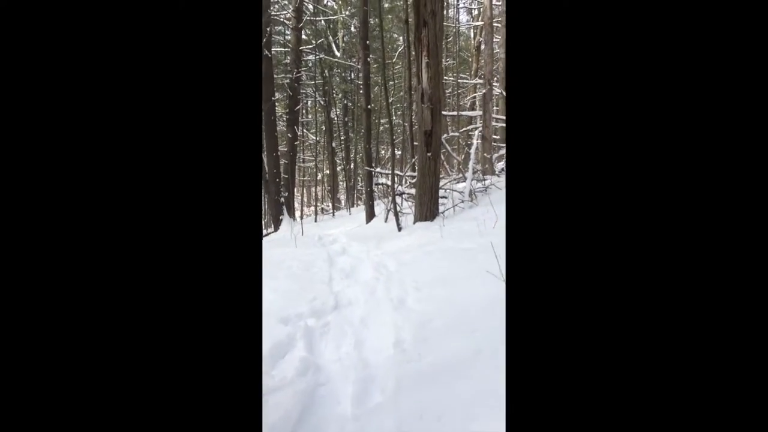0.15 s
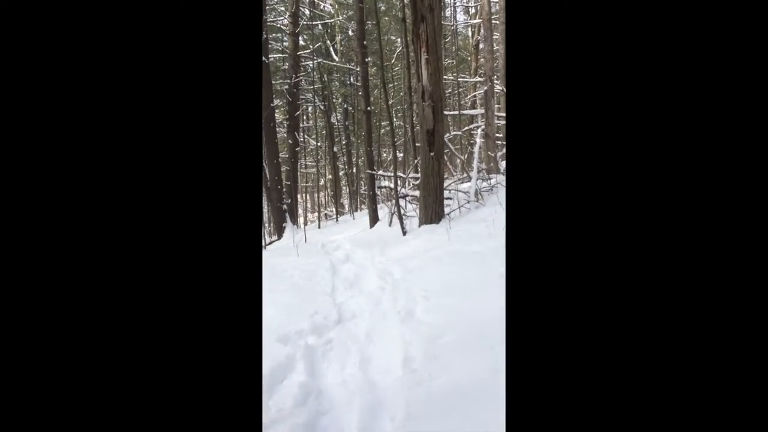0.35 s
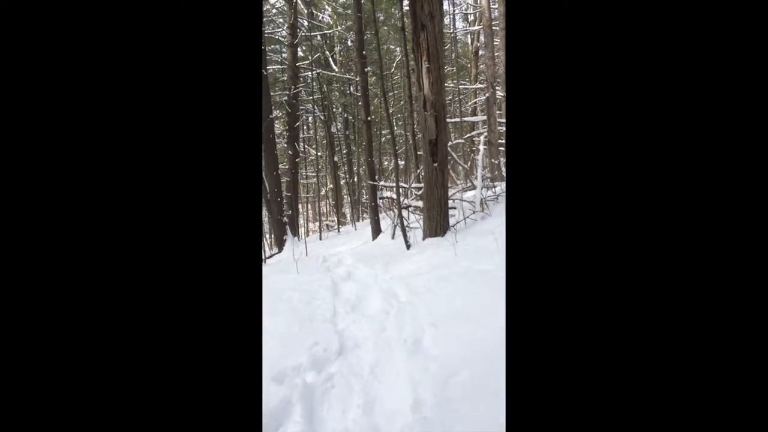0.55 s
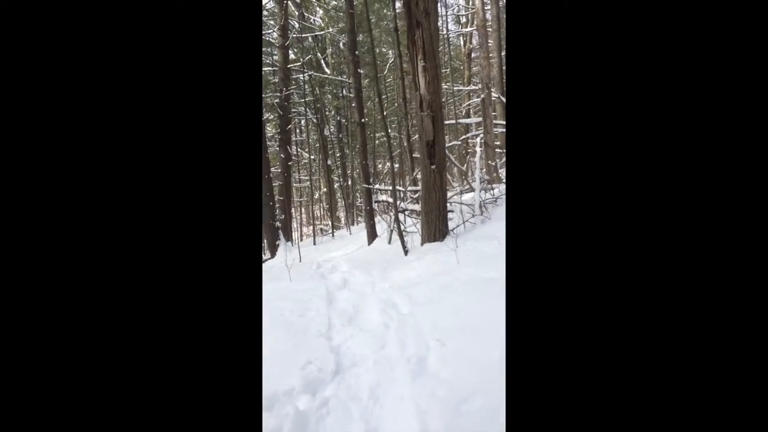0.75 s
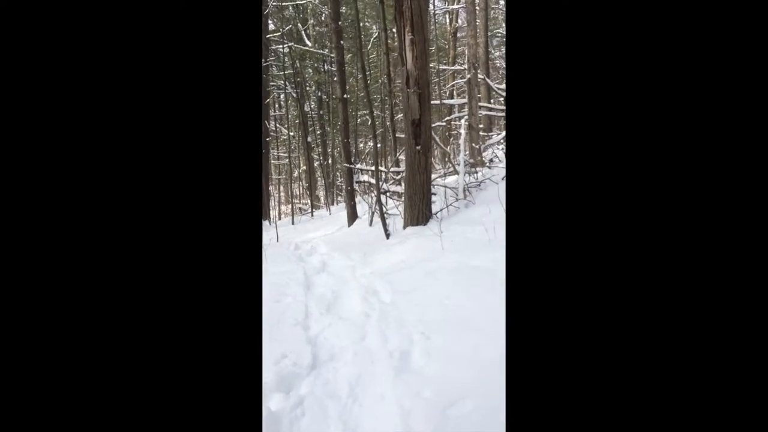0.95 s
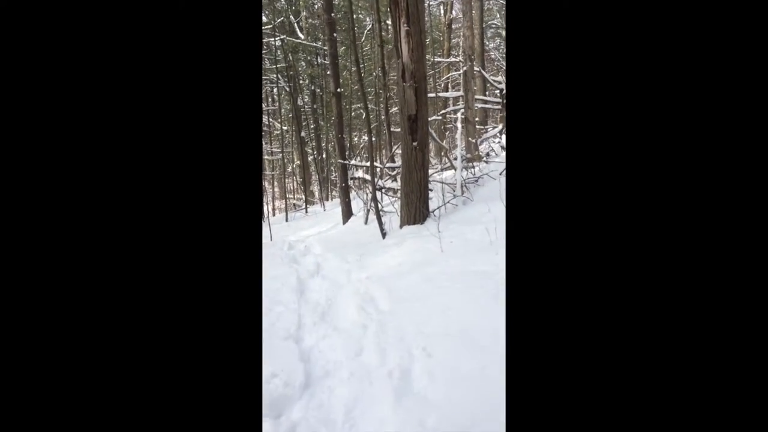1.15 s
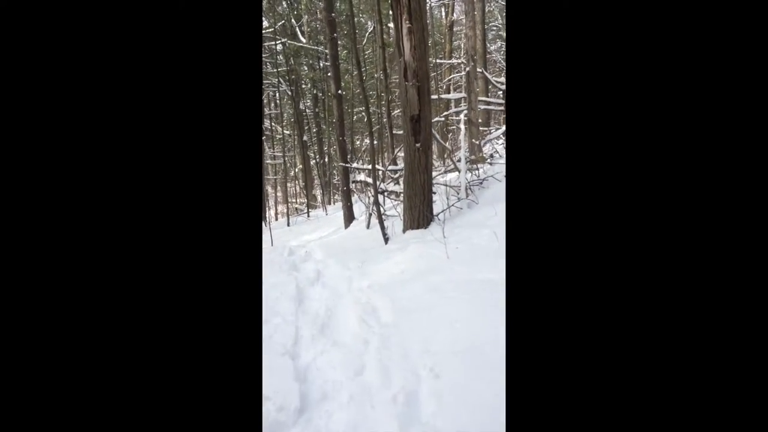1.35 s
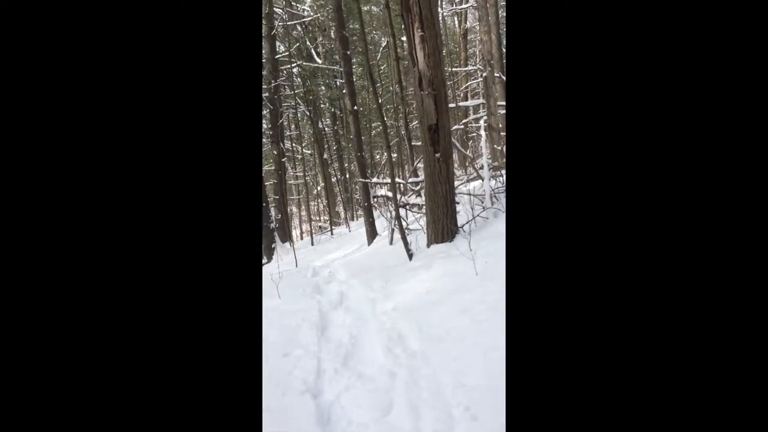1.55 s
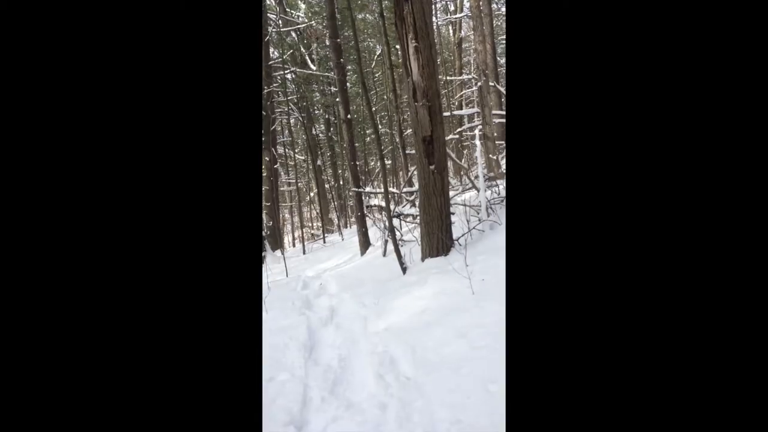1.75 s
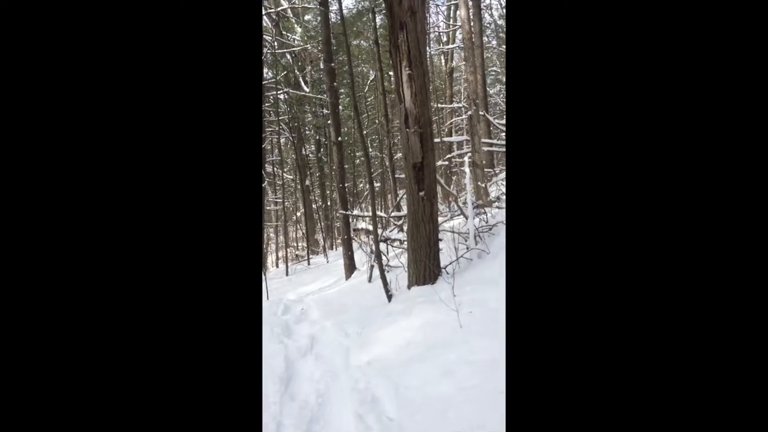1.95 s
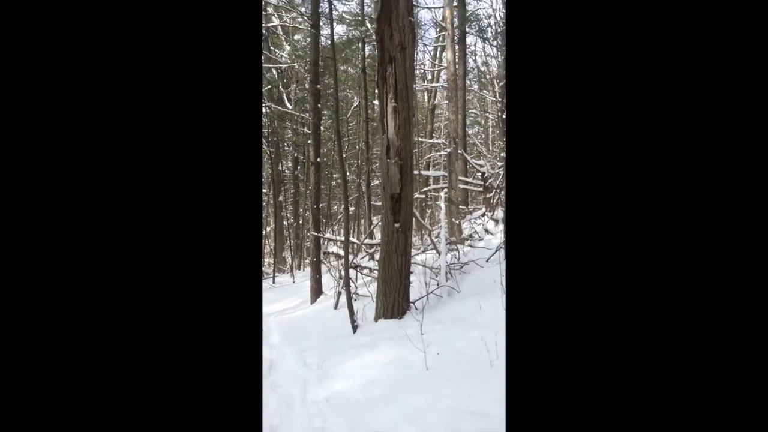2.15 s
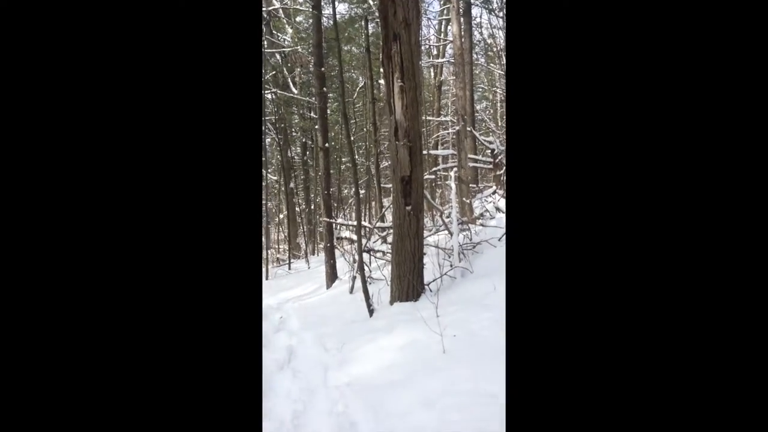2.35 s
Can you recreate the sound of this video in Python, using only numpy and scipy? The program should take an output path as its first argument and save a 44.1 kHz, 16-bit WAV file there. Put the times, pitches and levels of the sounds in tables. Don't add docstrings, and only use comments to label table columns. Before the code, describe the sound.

Footsteps on snow, heard from a phone in the walker's hand: powder drags, dull thuds and icy crunches, a tiny strap squeak, then sleeve rustle and low handling bumps, outdoors with almost no echo.

```python
import sys
import numpy as np
from scipy import signal
from scipy.fft import rfft, irfft
from scipy.io import wavfile
from scipy.ndimage import uniform_filter1d

SR = 44100
rng = np.random.default_rng(int(sys.argv[2]) if len(sys.argv) > 2 else 0)


def transcribe(signal):
    frames = np.atleast_2d(signal).T
    limited = np.clip(frames, -1, 1)
    pcm = np.round(limited * 32767).astype(np.int16)
    wavfile.write(sys.argv[1], SR, pcm)


def nominal_scale(level):
    x = np.asarray(level, float) / 20
    return 10 ** x


N = 110250
TIME_S = np.arange(N) / SR

# pitch_hz, level_db (per Hz)
WOODS_TONE = [(18, -60), (30, -7), (662, -4), (1110, -7.5), (1730, -13), (2990, -27.5), (3680, -20.5),
              (4200, -26.5), (15000, -34.5)]
# peak_s, level_db, pitch_hz
BUMPS = [(.07, -58.5, 90), (1.0, -56, 100), (1.1229, -48, 2020), (1.24, -58, 100), (1.585, -49.5, 95),
         (1.612, -54.5, 80), (1.71, -55, 90), (1.861, -36.5, 79), (1.902, -43.5, 67), (1.92, -46, 80),
         (1.9314, -50, 152), (1.989, -49, 204), (2.0361, -41, 248), (2.0443, -44, 210), (2.0776, -40.5, 96),
         (2.0946, -38.5, 65.7), (2.1355, -50, 70), (2.203, -46.5, 60), (2.2204, -37.5, 108),
         (2.2383, -45, 117), (2.3547, -45.5, 84.5), (2.399, -50.5, 70)]
# time_s, pitch_hz, level_db
SLEEVE_PATH = [
    (1.90, 6200, -76),
    (1.95, 6800, -65),
    (2.029, 7700, -61.5),
    (2.06, 7800, -77),
]
# time_s, pitch_hz, level_db
SQUEAK_PATH = [
    (.959, 5700, -78),
    (.967, 5000, -64.5),
    (.984, 6150, -62.5),
    (.988, 4640, -62.5),
    (.992, 2500, -80),
]
# start_s, peak_db, pitch_hz
TICKS = [(0.0932, -45.5, 4100), (0.415, -52, 4470), (0.6625, -54, 4010), (0.6789, -58, 4700),
         (0.69, -55, 4260), (0.7284, -47, 6680), (0.7514, -47, 6520), (0.772, -42, 6520),
         (0.7808, -43, 4300), (0.7914, -42, 7030), (0.8031, -43, 4600), (1.0124, -55, 3580),
         (1.1222, -49, 2920), (1.3944, -39.5, 6350), (1.572, -59, 8000), (1.648, -57, 5980),
         (1.6679, -50, 6140), (1.9018, -46, 4273), (2.3855, -55, 4540)]
TICK_RINGS_HZ = (4100, 6800, 9900)
# start_s, peak_db, pitch_hz
KNOCKS = [(0.2460, -39.5, 800), (0.263, -45, 970), (0.37, -46, 905), (.417, -45.5, 895), (.8113, -36, 644),
          (0.9476, -44.5, 1830), (.992, -49.5, 710), (1.046, -53.5, 470), (1.1226, -56, 520),
          (1.394, -38.5, 2490), (1.567, -46.5, 855), (1.775, -49, 1310), (1.807, -47.5, 920),
          (2.033, -43.5, 730), (2.166, -48, 880)]
# start_s, fullest_s, end_s, level_db, finest_hiss_extra_db
DRAGS = [(.0, 0.168, 0.27, -59.5, -5.5), (0.177, .25, 0.33, -54, -0.5), (0.298, .37, 0.37, -63, -16),
         (0.411, 0.41, 0.53, -59.5, -10), (0.581, 0.609, 0.65, -59, -1), (0.659, 0.677, 0.79, -56.5, -0.5),
         (.77, .775, 0.8, -59.5, -2), (0.792, 0.849, 0.9, -51.5, -4.5), (0.906, 1.01, 1.075, -63, -5),
         (1.11, 1.167, 1.225, -65, -2), (1.232, 1.325, 1.48, -58.5, -3), (1.35, 1.435, 1.5, -53, 0),
         (1.476, 1.513, 1.78, -66, -7), (1.575, 1.585, 1.674, -64, 2), (1.727, 1.801, 1.853, -59, 0.5),
         (1.84, 1.86, 1.92, -71, -2), (1.881, 1.937, 2.03, -57.5, -1.5), (1.943, 2.04, 2.104, -57, 1.5),
         (2.066, 2.12, 2.42, -64.5, -9), (2.413, 2.485, 3.1, -61, -5)]
# pitch_hz, level_db (per Hz)
DRAG_TONE = [(880, -5.5), (1500, -2), (3120, -6), (4050, -3), (5670, -5), (6610, -4), (8750, -6.5),
             (15000, -12.5)]
# peak_s, level_db, pitch_hz
CRUSTS = [(.0823, -51, 1650), (.1502, -50, 1400), (.2470, -43, 1560), (.2559, -46, 1180),
          (.2754, -41, 1180), (.2865, -53, 1010), (.3218, -55, 700), (.3492, -59, 990), (.3735, -46, 2020),
          (.4205, -45, 2060), (.5208, -52, 1960), (.5527, -57, 1980), (.6001, -55, 420), (.6630, -49, 1180),
          (.6690, -48, 1660), (.7064, -48.5, 700), (.8022, -50, 1660), (.8406, -48, 1650),
          (.8481, -51, 2800), (.8556, -47, 3300), (.8600, -46, 1250), (.8705, -46, 420), (.8785, -50, 1700),
          (.9254, -43.5, 650), (.9394, -52, 1900), (.9803, -51.5, 593), (.9957, -53, 990),
          (1.2357, -52, 1390), (1.3450, -50, 348), (1.3574, -45, 350), (1.4018, -48, 2800),
          (1.4123, -53, 1410), (1.4312, -42, 2350), (1.4492, -46, 2800), (1.4572, -44, 825),
          (1.4756, -45, 343), (1.4831, -49, 346), (1.4921, -52, 1400), (1.5325, -52, 1400),
          (1.5690, -48.5, 1490), (1.7899, -53, 990), (1.9336, -46, 1180), (1.9386, -50, 1180),
          (1.9715, -49, 1400), (1.9775, -49.5, 346), (2.0394, -49, 995), (2.0932, -53, 1400),
          (2.1162, -51, 990), (2.1366, -47.5, 990), (2.1431, -47.5, 487), (2.1676, -48, 1720),
          (2.3165, -57, 1090), (2.4040, -53, 416), (2.4434, -61, 590)]
# start_s, fullest_s, end_s, level_db, bass_extra_db
PACKS = [(0.098, 0.23, 0.34, -58.5, -11), (0.246, 0.261, 0.3, -48, -3), (0.3, 0.387, 0.49, -57.5, 3),
         (0.441, 0.534, 0.76, -60, -9.5), (0.624, .70, 0.83, -60, -33), (0.787, 0.824, 0.84, -53.5, -13),
         (0.828, 0.845, 0.89, -49.5, 3.5), (0.897, 0.941, 0.96, -57, 8), (0.984, 0.99, 1.04, -69, -5),
         (1.16, 1.24, 1.21, -74, 6.5), (1.332, 1.362, 1.37, -56, -7), (1.366, 1.42, 1.51, -50.5, -0.5),
         (1.482, 1.56, 1.57, -61, 5), (1.664, 1.702, 1.7, -68, -11), (1.742, 1.776, 1.84, -62, -0.5),
         (1.865, 1.916, 2.09, -62, 4), (1.995, 2.047, 2.33, -57, -2), (2.1, 2.17, 2.25, -61.5, 3.5),
         (2.383, 2.4, 2.7, -70.5, 5)]
# pitch_hz, level_db (per Hz)
CRUNCH_TONE = [(250, -1.5), (450, 1.5), (620, -2.5), (920, 1.5), (1450, -3), (2150, -4.5), (2700, -10),
               (8000, -23.5)]
# pitch_hz, level_db (per Hz)
GIVE_TONE = [(25, -38), (55, 5), (150, -3.5), (300, -3.5), (500, -15.5), (900, -47.5)]
# peak_s, level_db, pitch_hz
THUDS = [(0.1989, -41, 324), (0.2189, -46, 82.5), (0.2477, -19.5, 184.5), (0.2661, -44, 149),
         (0.2754, -42, 157.0), (0.2936, -49, 150), (0.3003, -50, 108), (0.3326, -43, 181),
         (0.3494, -45, 198), (0.3638, -44.5, 230), (0.3883, -43, 202), (0.4030, -44.5, 149),
         (0.4075, -42.5, 156), (0.7085, -54, 350), (0.8143, -37, 395), (0.8373, -50, 220),
         (0.8416, -30, 239), (0.8485, -36, 99), (0.8565, -48, 190), (0.8819, -44.5, 158.0),
         (0.8981, -49, 62), (0.9204, -47.5, 140), (0.9402, -37, 470), (0.9487, -36.5, 236),
         (1.3956, -25.5, 212), (1.4181, -48, 273), (1.4277, -51, 140), (1.4358, -45.5, 147.0),
         (1.4508, -49, 100), (1.4598, -47, 250), (1.472, -46, 200), (1.482, -40.5, 114), (1.5042, -49, 140),
         (1.5573, -54.5, 200), (1.5685, -51, 221), (1.8075, -45.5, 402)]


def colour(x, tone):
    hz, db = np.array(tone, float).T
    f = np.maximum(np.arange(N // 2 + 1) * SR / N, 1)
    gain = nominal_scale(np.interp(np.log(f), np.log(hz), db))
    y = irfft(rfft(x) * gain, N)
    return y / np.sqrt(np.mean(y ** 2))


def low_part(x, cutoff_hz, order):
    return signal.sosfiltfilt(signal.butter(order, cutoff_hz, fs=SR, output="sos"), x)


def walk(rate_hz):
    k = int(SR / rate_hz)
    steps = np.repeat(rng.standard_normal(N // k + 1), k)
    return 1.3 * uniform_filter1d(uniform_filter1d(steps, k), k)[:N]


def swarm(rate_hz, spread_db):
    size = np.minimum(rng.exponential(size=N), 2.5)
    return (rng.random(N) < rate_hz / SR) * nominal_scale(2 * spread_db * size)


def grains(rate_hz, spread_db, bed, burst_s):
    shared = swarm(rate_hz, spread_db)
    f = np.arange(N // 2 + 1) * SR / N
    spectrum = 0
    for low in 31 * 2. ** np.arange(9):
        fade_s = max(burst_s, 1 / low)
        hits = swarm(rate_hz, spread_db) + 0.78 * shared
        power = signal.lfilter([1], [1, -np.exp(-1 / (fade_s * SR))], hits)
        burst = rng.standard_normal(N) * np.sqrt(power / power.mean() + bed)
        spectrum = spectrum + rfft(burst) * (f >= low) * (f < 2 * low)
    return irfft(spectrum, N)


def swells(start, fullest, end, db, edge_db, fade_db):
    power = np.zeros(N)
    for a, b, c, d in zip(start, fullest, end, db):
        shape_db = np.interp(TIME_S, [a, b, c], [edge_db, 0, fade_db])
        power += nominal_scale(2 * (d + shape_db)) * (TIME_S > a) * (TIME_S < c)
    return uniform_filter1d(np.sqrt(power), size=300)


def pushes(rows, rise_cycles, fall_cycles, sag, mode_db):
    out = np.zeros(N)
    for s, db, hz in rows:
        near = slice(max(int(s * SR) - 4096, 0), int(s * SR) + 4096)
        turns = (TIME_S[near] - s) * hz
        before = turns < 0
        bell = np.where(before, np.exp(-.5 * (turns / rise_cycles) ** 2), np.exp(-(turns / fall_cycles) ** 2))
        first = np.cos(2 * np.pi * turns * np.where(before, 1, sag))
        second = nominal_scale(mode_db) * np.cos(2 * np.pi * turns * 1.77)
        out[near] += nominal_scale(db) * bell * (first + second)
    return out


def woods():
    hush = colour(rng.standard_normal(N), WOODS_TONE)
    bass = low_part(hush, 200, 2)
    gusty = bass * nominal_scale(2.5 * walk(15))
    steady = (hush - bass) * nominal_scale(0.8 * walk(15))
    return (gusty + steady) * nominal_scale(-62.5)


def bumps():
    return pushes(BUMPS, rise_cycles=0.5, fall_cycles=0.7, sag=0.91, mode_db=-23.5)


def sleeve():
    s, hz, db = np.array(SLEEVE_PATH).T
    rough = walk(4400) * nominal_scale(2.9 * walk(250))
    turn = 2 * np.pi * np.cumsum(np.interp(TIME_S, s, hz)) / SR
    return rough * np.sin(turn) * nominal_scale(np.interp(TIME_S, s, db, -140, -140))


def squeak():
    s, hz, db = np.array(SQUEAK_PATH).T
    pitch = np.interp(TIME_S, s, hz) * (1 + .045 * walk(1500))
    turn = 2 * np.pi * np.cumsum(pitch) / SR
    whistle = np.sin(turn) + .18 * np.sin(2 * turn)
    return whistle * nominal_scale(np.interp(TIME_S, s, db, -140, -140) + 3 * walk(600))


def ticks():
    out, t = np.zeros(N + 512), np.arange(512) / SR
    for s, db, hz in TICKS:
        pitches = (hz, *TICK_RINGS_HZ)
        shares = (.6, *(rng.random(3) * (.7, .7, .25)))
        ring = 0
        for f, share in zip(pitches, shares):
            ring = ring + share * np.sin(2 * np.pi * f * t) * np.exp(-t * f / 1.5)
        i = int(s * SR)
        out[i:i + 512] += nominal_scale(db) * ring
    return out[:N]


def knocks():
    ring_cycles, snap_db, snap_s = 2.86, -0.5, 0.0037
    out, t = np.zeros(N + 2048), np.arange(2048) / SR
    dull = signal.butter(2, 2900, fs=SR, output="sos")
    for s, db, hz in KNOCKS:
        noise = rng.standard_normal(2048) * np.exp(-t / snap_s)
        snap = nominal_scale(snap_db) * signal.sosfilt(dull, noise)
        ring = np.sin(2 * np.pi * hz * t) * np.exp(-t * hz / ring_cycles)
        i = int(s * SR)
        out[i:i + 2048] += nominal_scale(db) * (ring + snap)
    return out[:N]


def drags():
    edge_db, fade_db = -11, -12
    fine_steeper = 1.2
    start, fullest, end, db, fine_db = np.array(DRAGS).T
    rub = colour(grains(rate_hz=1700, spread_db=4.5, bed=0.29, burst_s=0.00024), DRAG_TONE)
    rub = rub * nominal_scale(0.85 * walk(60.4))
    body = low_part(rub, 7700, 3)
    fine = rub - body
    body_gain = swells(start, fullest, end, db, edge_db, fade_db)
    fine_gain = swells(start, fullest, end, db + fine_db, edge_db * fine_steeper, fade_db * fine_steeper)
    return body * body_gain + fine * fine_gain


def crusts():
    return pushes(CRUSTS, rise_cycles=0.5, fall_cycles=1.3, sag=0.97, mode_db=-14.5)


def packing():
    edge_db, fade_db, give_db = -7.5, -11.5, 1
    start, fullest, end, db, bass_db = np.array(PACKS).T
    crunch = colour(grains(rate_hz=180, spread_db=3.2, bed=0.19, burst_s=0.0034), CRUNCH_TONE)
    give = colour(grains(rate_hz=44, spread_db=1.9, bed=0.99, burst_s=0.0034), GIVE_TONE)
    crunch_gain = swells(start, fullest, end, db, edge_db, fade_db)
    give_gain = swells(start, fullest, end, db + bass_db + give_db, edge_db, fade_db)
    return crunch * crunch_gain + give * give_gain


def thuds():
    return pushes(THUDS, rise_cycles=0.4, fall_cycles=1.15, sag=0.86, mode_db=-13)


def scene():
    background = woods() + bumps()
    gear = sleeve() + squeak() + ticks() + knocks()
    steps = drags() + crusts() + packing() + thuds()
    return (background + gear + steps)[None]


def roll_off(x):
    return signal.sosfilt(signal.butter(12, 15380, fs=SR, output="sos"), x)


def record(dry):
    top_cut = signal.ellip(10, .2, 70, 15250, fs=SR, output="sos")
    mix = signal.sosfilt(top_cut, dry)
    return roll_off(mix)


dry = scene()
out = record(dry)
transcribe(out)
```